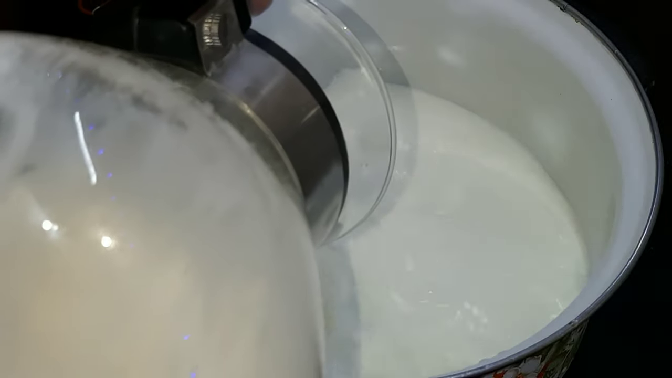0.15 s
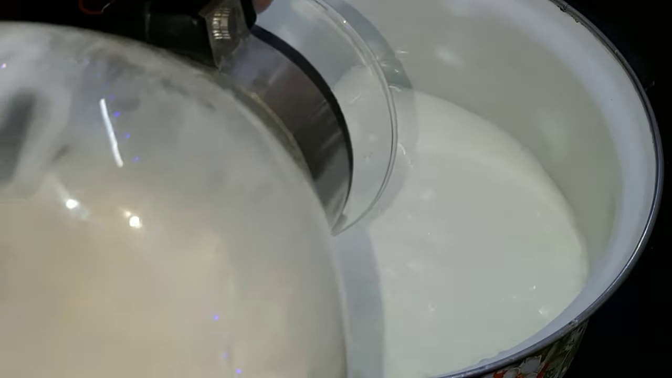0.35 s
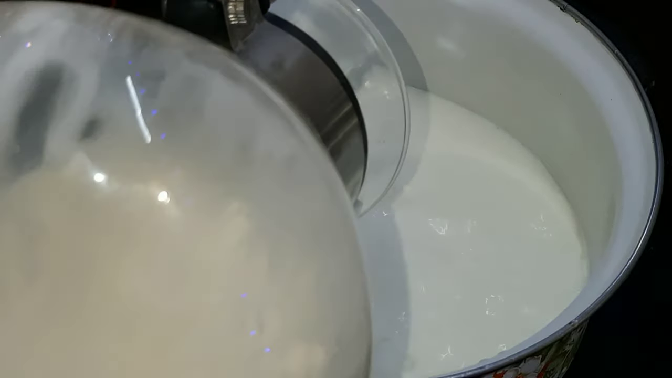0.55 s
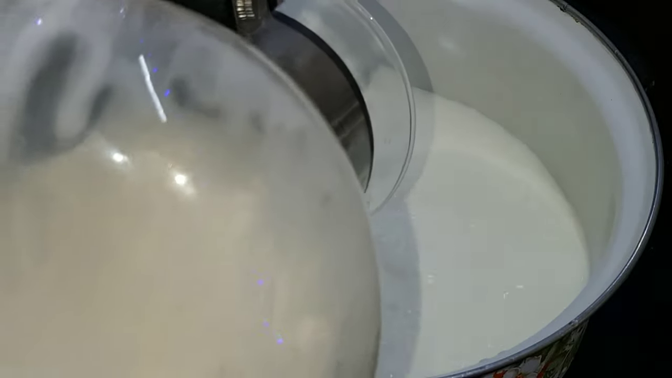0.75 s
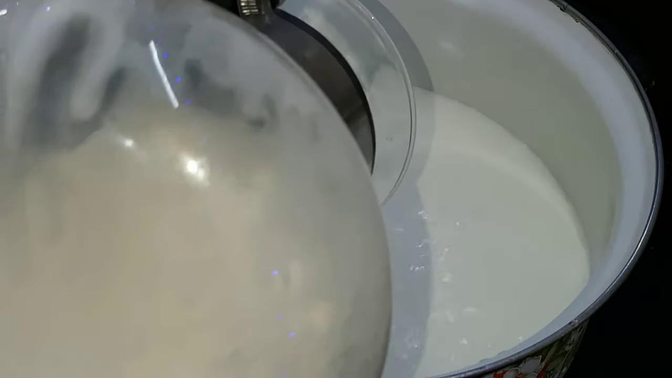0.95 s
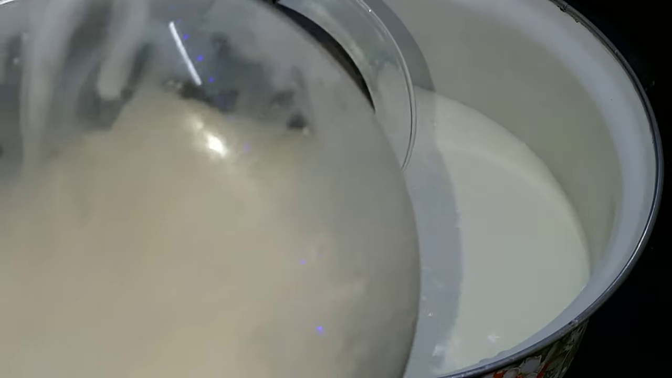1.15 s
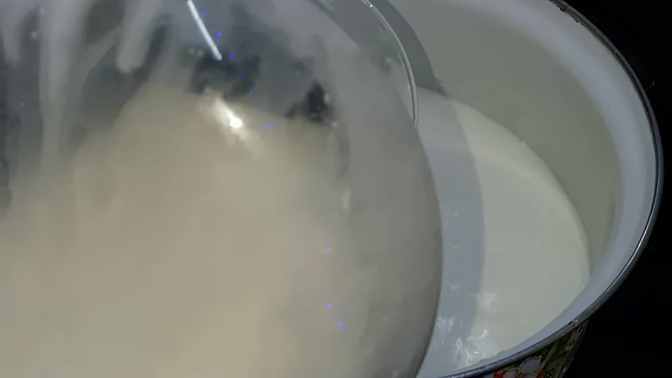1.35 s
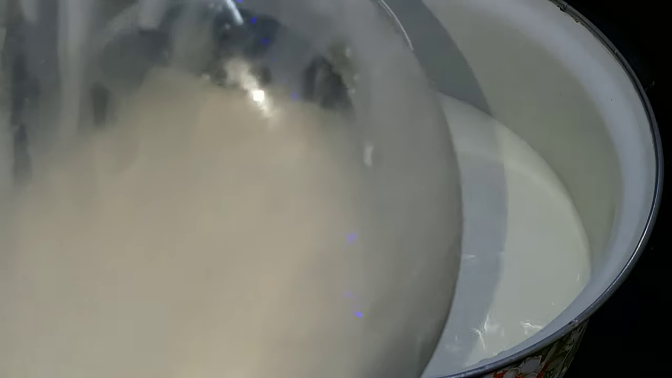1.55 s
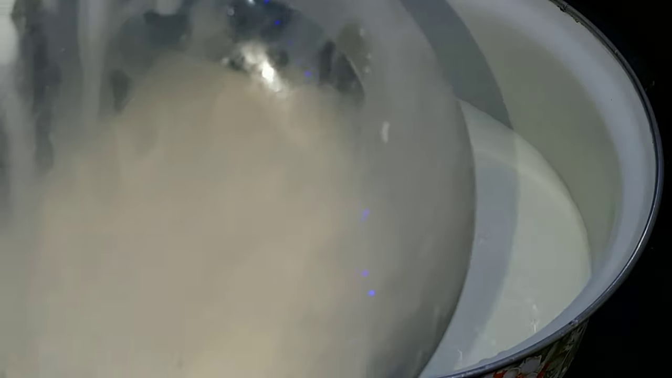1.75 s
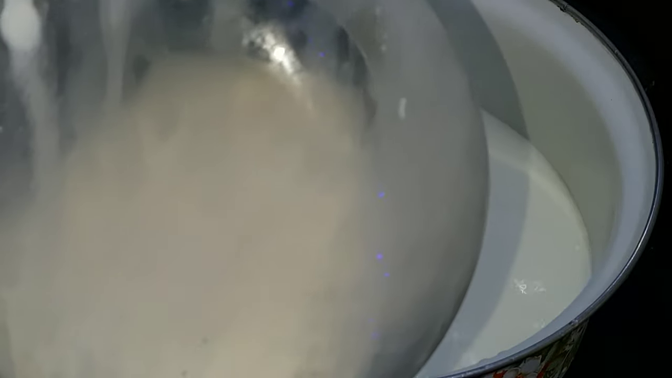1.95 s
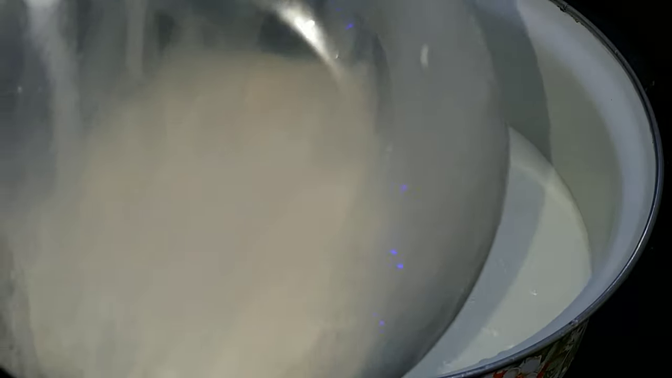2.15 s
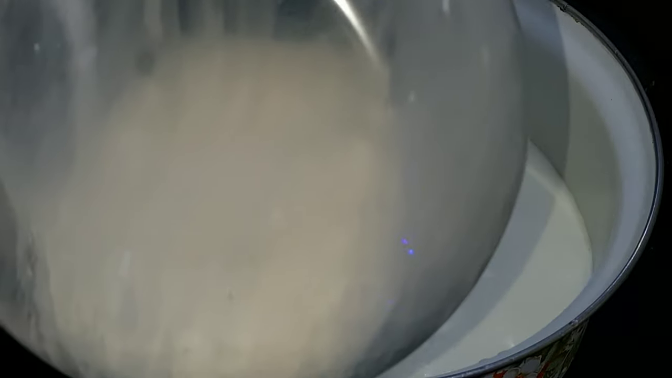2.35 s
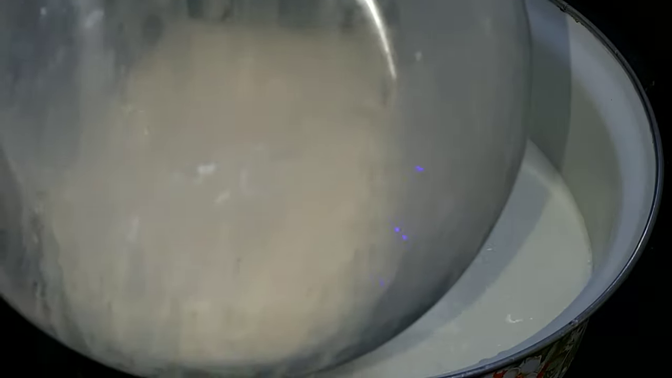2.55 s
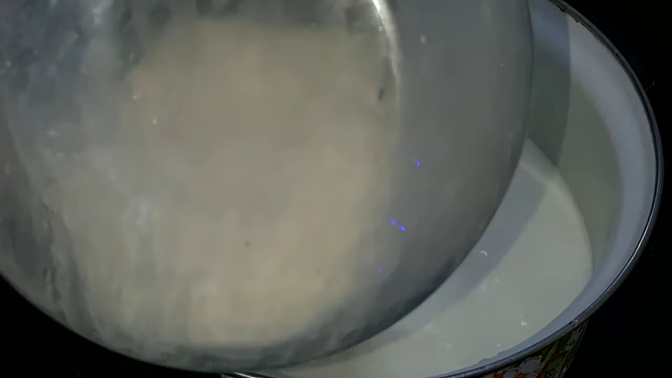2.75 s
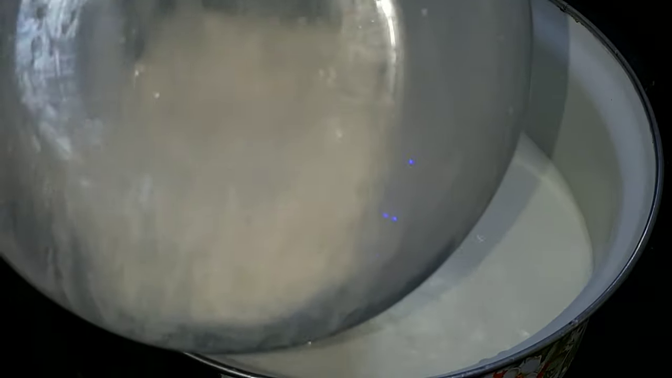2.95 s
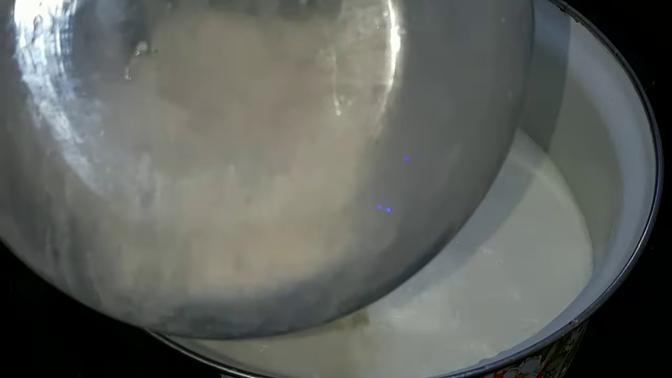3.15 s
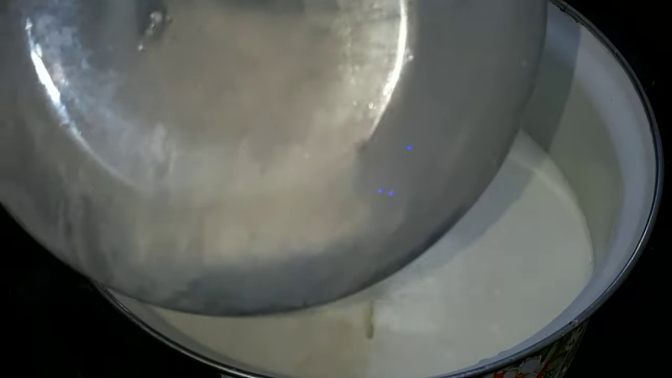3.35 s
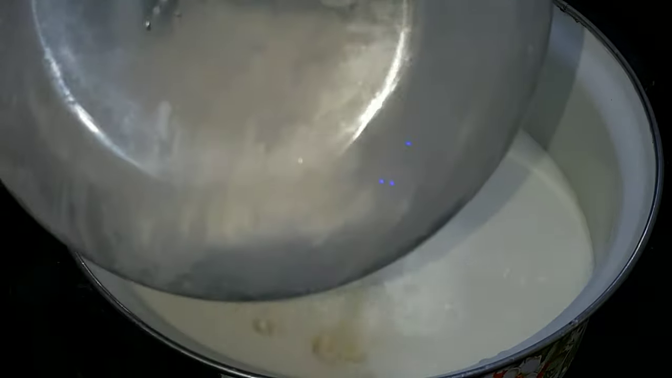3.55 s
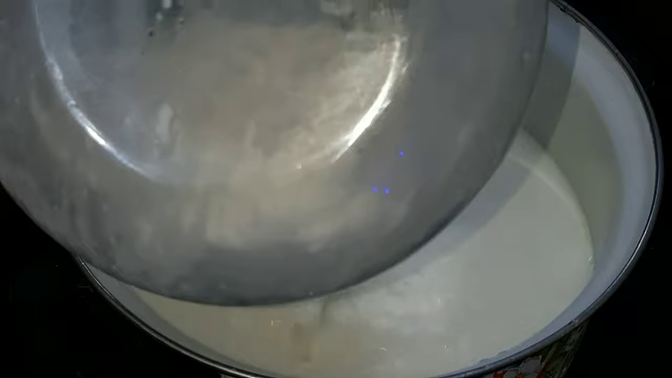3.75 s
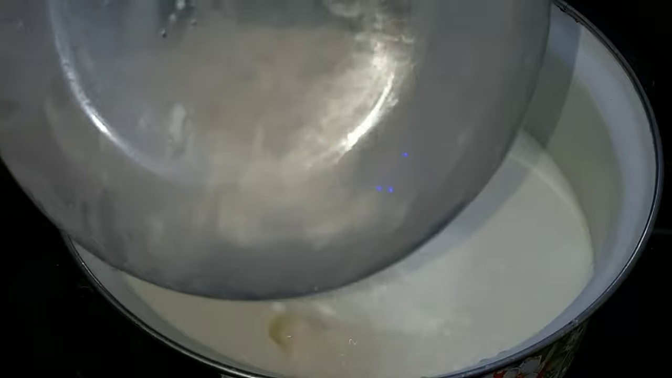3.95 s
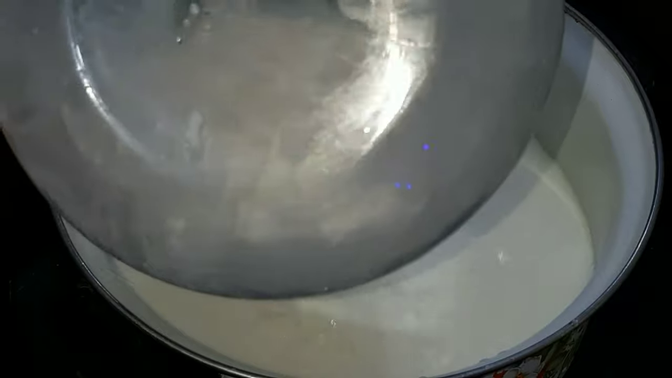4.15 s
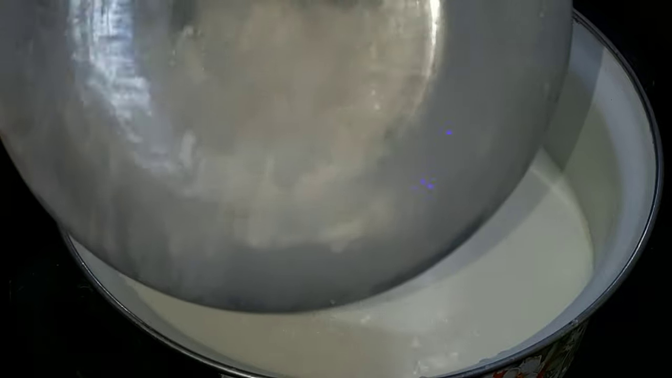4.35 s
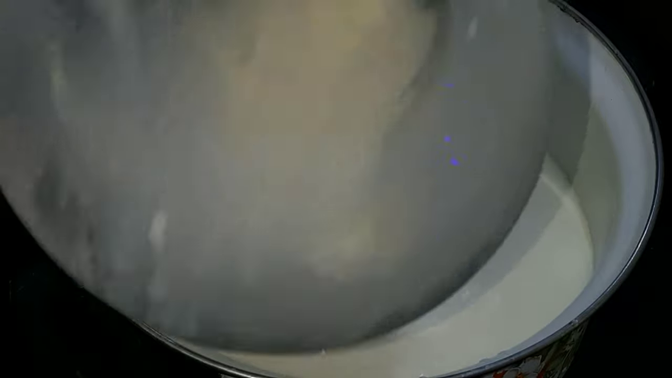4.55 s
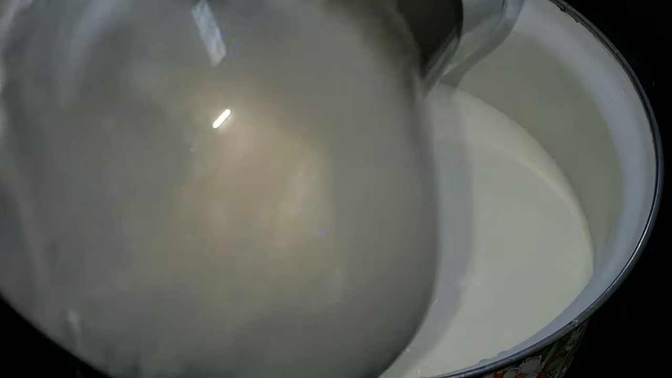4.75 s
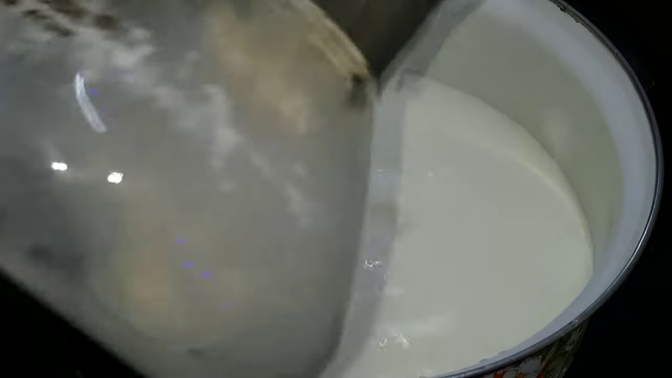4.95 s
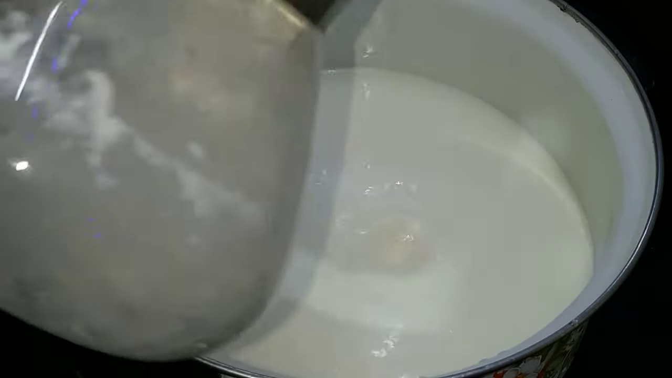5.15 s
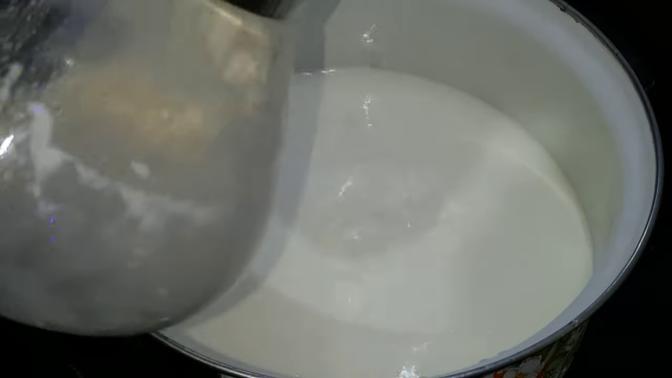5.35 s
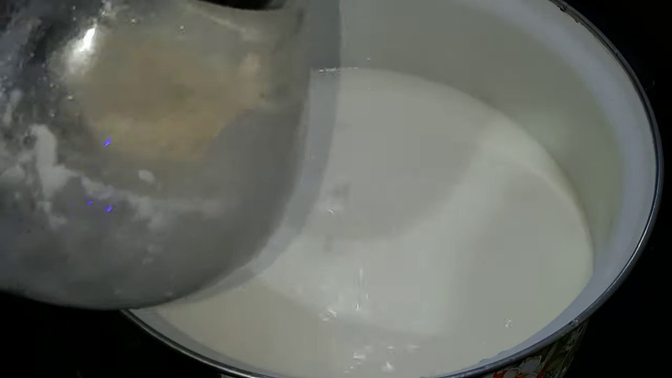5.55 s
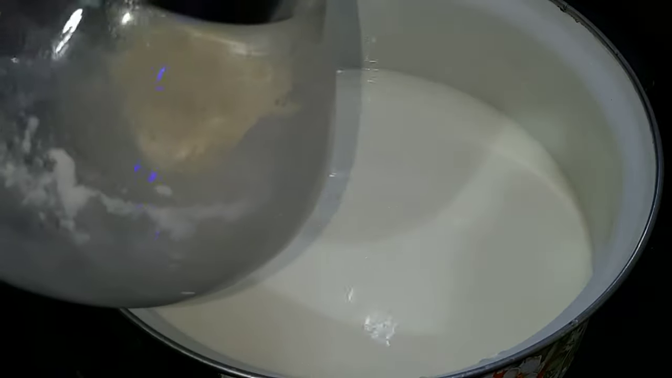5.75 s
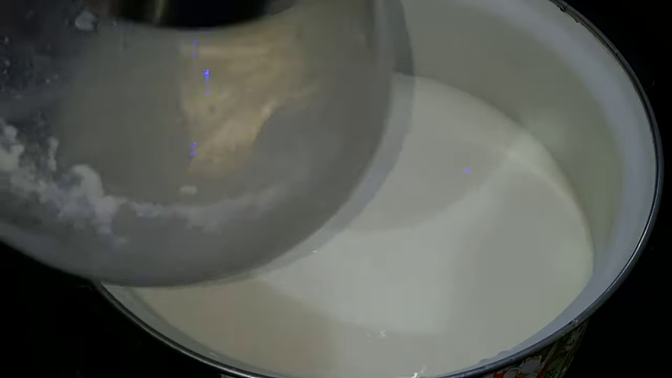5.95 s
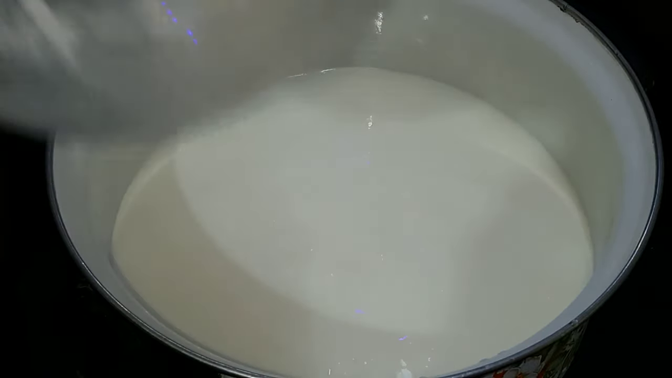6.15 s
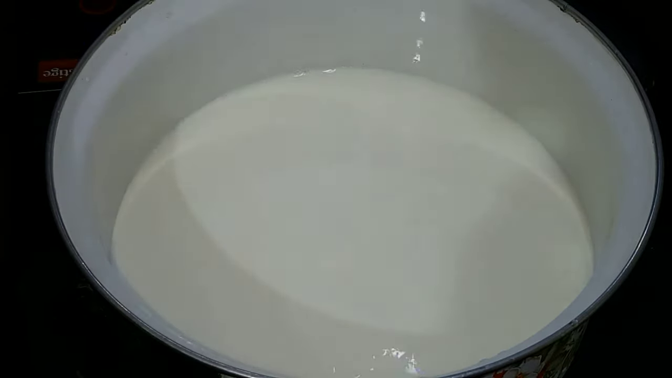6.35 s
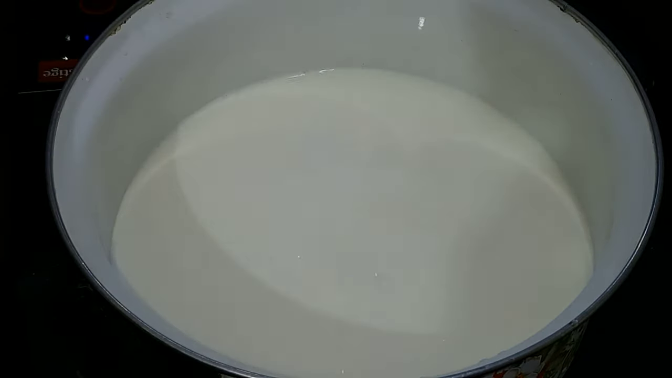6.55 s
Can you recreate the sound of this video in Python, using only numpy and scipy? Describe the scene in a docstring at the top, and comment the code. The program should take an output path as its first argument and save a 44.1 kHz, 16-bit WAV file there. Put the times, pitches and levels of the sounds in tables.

```python
"""A small kitchen, close by: milk is poured from a big vessel into a wide metal pot.
The stream is trains of gliding sine bubbles, ever larger ones, that ring the modes of the air in the pot;
splats and spray are coloured noise, and a few drops plink at the end.
Then the vessel knocks and settles: damped modes, dull shaking, noise cracks and small pings.
Beneath lie a shaped-noise rumble, hum sines, a thin throbbing whine and a soft rush that swells late."""
import sys
import numpy as np
from scipy import signal
from scipy.fft import rfft, irfft, next_fast_len
from scipy.io import wavfile
from scipy.ndimage import uniform_filter1d

SR = 44100
rng = np.random.default_rng(int(sys.argv[2]) if len(sys.argv) > 2 else 0)


def log_audio(samples):
    """Write samples as a 16-bit WAV file to the path given in sys.argv[1]."""
    # one column per channel
    frames = np.atleast_2d(samples).T
    # limit to full scale, then quantise
    limited = np.clip(frames, -1, 1)
    pcm = np.round(limited * 32767).astype(np.int16)
    wavfile.write(sys.argv[1], SR, pcm)


N = 290831  # length in samples

# the stream: (time [s], relative gurgle level [dB], relative spray level [dB])
STREAM_FLOW = [(0.0, -45, -37), (0.35, -49, -36.5), (0.67, -45.5, -37.5), (1.63, -37, -35.5),
               (2.01, -29.5, -37), (2.47, -31, -35), (2.69, -30.5, -38), (3.49, -30, -37), (3.87, -46, -49)]
# loudest pockets of air:
# (time [s], relative peak [dB], bubble pitch [Hz], relative splash level [dB], relative thump level [dB])
AIR_POCKETS = [(0.262, -22, 2310, -40, -46), (0.289, -19, 2530, -35, -38), (0.58, -22.5, 1540, -29, -29.5),
               (0.701, -22, 1870, -38.5, -35), (0.764, -24, 1530, -34, -36.5),
               (0.837, -18, 2540, -31, -38.5), (1.024, -22.5, 1110, -21.5, -28.5),
               (1.076, -14, 1340, -27.5, -37), (1.129, -21, 1440, -27.5, -39),
               (1.23, -15.5, 3300, -30, -43), (1.268, -10.5, 2110, -24.5, -41),
               (1.289, -17.5, 1030, -28, -37.5), (1.449, -14.5, 1650, -18.5, -29.5),
               (1.516, -19.5, 900, -31, -36.5), (1.617, -20, 1660, -22, -39.5),
               (1.632, -14.5, 900, -20.5, -31), (1.794, -14, 1010, -35, -35), (1.813, -13, 770, -27, -28.5),
               (1.874, -21, 982, -39, -23.5), (1.948, -18, 1070, -25.5, -26.5),
               (1.991, -13.5, 1160, -21.5, -21), (2.063, -19, 750, -20, -28), (2.168, -11, 982, -24, -18.5),
               (2.209, -11, 746, -20.5, -25.5), (2.38, -17, 1530, -29, -26.5),
               (2.416, -10, 1110, -27, -28.5), (2.602, -12, 1950, -17.5, -30),
               (2.63, -10, 835, -20.5, -22.5), (2.661, -13.5, 830, -27.5, -20),
               (2.707, -12, 740, -29.5, -24.5), (2.749, -13.5, 780, -31, -20.5),
               (2.848, -11, 700, -26, -27), (2.876, -13, 1580, -23, -22), (3.067, -16.5, 760, -32.5, -40),
               (3.102, -18.5, 740, -35, -36.5), (3.171, -8.5, 720, -33.5, -27.5),
               (3.242, -13, 710, -23.5, -25.5), (3.268, -12.5, 716, -28.5, -21),
               (3.318, -17.5, 735, -33, -22), (3.398, -8.5, 740, -25.5, -18),
               (3.429, -11.5, 716, -22.5, -26), (3.52, -12.5, 726, -17.5, -21),
               (3.622, -13, 780, -24.5, -42), (3.675, -18, 740, -32, -41), (3.758, -19, 835, -29, -52),
               (3.896, -14, 780, -24.5, -28)]
# blows of the vessel: (time [s], relative ring level [dB], contact corner [Hz], crack level [dB])
VESSEL_BLOWS = [(4.827, -12, 7000, -6.5), (4.892, -31, 432, -51), (4.925, -37.5, 7000, -17.5),
                (5.063, -20.5, 112, -61)]

POUR_S = 4.2  # end of the stream
THINS_S, THIN_DB_PER_S = 3.615, 56  # the vessel runs empty and the small bubbles die away
BUILD_S, BUILD_DB = 0.56, -16.5  # the small bubbles build up as the pour gets going
FULL_FLOW_DB = -32  # gurgle level that counts as full flow
GUSH_S, GUSH_DB = 0.058, 3.5  # the stream gushes after each pocket of air and lulls in between
BIG_GULP_HZ = 770
WHINE_HZ, THROB_HZ, THROB_PEAK_S = 6755, 9.13, 6.07
LEFT_DB = -4  # left channel relative to right
TOP_HZ = 16000


def stream(pot, gurgle_db=-7, tinkle_db=-38, foam_db=-4.0, spray_db=0.24, direct_db=-12, ring_db=-4,
           big_hz=620, big_octaves_per_db=-0.01, small_hz=1620, octaves_per_db=0.01):
    """The falling milk: big bubbles boom in the pot, small ones tinkle, foam crackles, spray hisses."""
    t = np.arange(N) / SR
    flow = flow_db(t)
    shrink = 2 ** (-octaves_per_db * flow)  # smaller, higher bubbles in a weaker flow
    big_pitch_hz = big_hz * 2 ** (big_octaves_per_db * flow)
    big = bubbles(rate=170, pitch_hz=big_pitch_hz, octaves=0.6, cycles=4.7, scatter_db=3.5)
    small = bubbles(rate=320, pitch_hz=small_hz * shrink, octaves=0.902, cycles=23.7, scatter_db=4.5)
    foam = bubbles(rate=240, pitch_hz=4900 * shrink, octaves=0.638, cycles=39, scatter_db=6)
    droplets = spray(rate=390, scatter_db=6.5, smear_s=0.0021, mist_db=-7)

    building = amp(BUILD_DB * np.maximum(1 - t / BUILD_S, 0))
    thinning = amp(-THIN_DB_PER_S * np.maximum(t - THINS_S, 0))
    running = np.clip((POUR_S - t) / 0.44, 0, 1)  # the stream breaks, and its spray goes first

    gurgle = steady(through(big, pot) + amp(direct_db) * big)
    gurgle = gurgle * amp(FULL_FLOW_DB + flow + gurgle_db)
    tinkle = steady(small + amp(ring_db) * through(small, pot))
    tinkle = tinkle * amp(tinkle_db) * building * thinning
    hiss = steady(foam) * amp(foam_db) + steady(droplets) * amp(spray_db)
    hiss = hiss * amp(curve(STREAM_FLOW, axis=2)) * running ** 2
    return ((gurgle + tinkle) * gushes() + hiss) * running


def flow_db(s):
    """Strength of the flow at a time, in dB relative to full flow."""
    when, gurgle_db, _ = np.transpose(STREAM_FLOW)
    return np.interp(s, when, gurgle_db) - FULL_FLOW_DB


def bubbles(rate, pitch_hz, octaves, cycles, scatter_db):
    """A random train of bubbles (rate per second) around a moving pitch; a few are much louder."""
    out = np.zeros((2, N))
    for when, spread, life, size, place in rng.random((int(rate * POUR_S), 5)):
        s = when * POUR_S
        hz = pitch_hz[int(s * SR)] * 2 ** (octaves * (2 * spread - 1))
        gain = amp(-scatter_db * np.log(1 - .97 * size))
        add(out, s, gain * bubble(hz, cycles * (.5 + life), place))
    return out


def bubble(hz, cycles, place, glide=0.11, lag_s=0.00014):
    """A trapped bubble rings down as its pitch glides by a share; its place (0-1) delays it on the left."""
    life = cycles / hz
    delay = np.array([[place * lag_s], [0]])
    age = np.maximum(seconds(life) - delay, 0) / life
    tone = np.sin(2 * np.pi * cycles * (age + glide * age ** 2 / 2))
    return tone * np.exp(-np.log(300) * age) * (1 - np.exp(-age * cycles * 2))


def gushes():
    """Gain of the bubbling: it jumps when a pocket of air closes and sinks back."""
    kicks = np.zeros(N)
    kicks[[int(row[0] * SR) for row in AIR_POCKETS]] = 1
    surge = signal.lfilter([1], [1, -np.exp(-1 / (GUSH_S * SR))], kicks)
    return amp(GUSH_DB * np.minimum(surge, 1))


def spray(rate, scatter_db, smear_s, mist_db, size=70):
    """Droplets of three sizes tick on the surface, each in its own band, over a fine fizz of foam."""
    # colour of the spray: (frequency [Hz], level [dB])
    spray_colour = [(300, -32.5), (1200, -5.5), (2500, 1), (3500, 1), (4800, -3.5), (6200, -0.5),
                    (7400, 7.5), (8400, -5.5), (12000, -1), (16000, -6.5)]
    out = 0
    for edges_hz in [(300, 4500), (4500, 9000), (9000, 17000)]:
        ticks = np.zeros(N)
        when, mass = rng.random((int(rate * N / SR), 2)).T
        ticks[(when * N).astype(int)] = amp(scatter_db * np.minimum(-np.log(1 - mass), 4.5))
        # each tick becomes a short decaying patch of noise power
        power = signal.lfilter([1], [1, -np.exp(-2 / (smear_s * SR))], ticks ** 2)
        power = np.abs(uniform_filter1d(power, size))
        hiss = np.sqrt(power / power.mean() + amp(mist_db) ** 2) * rng.standard_normal((2, N))
        out = out + signal.sosfilt(signal.butter(2, edges_hz, "band", fs=SR, output="sos"), hiss)
    return colour(out, spray_colour)


def pot_air(apart_hz=2200, lag_s=0.00008):
    """Impulse response of the air from milk to rim; higher modes reach the sides more out of step."""
    # modes of the air in the pot: (frequency [Hz], width [Hz], level [dB])
    air_modes = [(353,7.3,-10.5), (412.6,16,0.5), (431.7,29,3), (505,16,-8.5), (532,31,1), (671,22,-5),
                 (745,17,6), (794,49,-6.5), (915,22,-9), (1020,23,-9.5), (1110,25,-6.5), (1142,21,-6),
                 (1330,28,-10.5), (1610,93,3), (1700,25,-8)]
    t = seconds(.12)
    side = np.array([[-1], [1]])
    response = 0
    for k, (hz, width, db) in enumerate(air_modes):
        decay = 2 * np.pi * width / SR * np.exp(-np.pi * width * t)
        phase = 2 * np.pi * hz * (t + side * lag_s / 2) + side * (-1) ** k * hz / apart_hz
        response = response + amp(db) * decay * np.cos(phase)
    return response


def thump(pot, hz=445, cycles=7.7):
    """The hollow note of the air in the pot when the surface is dented."""
    dent = np.pad(bubble(hz, cycles, .5), ((0, 0), (0, pot.shape[1])))
    return peak(through(dent, pot))


def gulps(pot, gulp_db=-1.5, cycles=9, cluster_db=4, cluster_s=.013, slap_db=7.0, ring_db=-5,
          boom_db=2, follow=.25):
    """Each pocket of air closes with a wet slap, rings, sheds smaller bubbles and thumps the pot air."""
    # colour of a wet slap, before its shift with pitch: (frequency [Hz], level [dB])
    slap_colour = [(200, -19.5), (700, -0.5), (1700, 0), (2600, -11.5), (8000, -21.5)]
    out, count = np.zeros((2, N)), 6000  # count: samples of room for the ring of the pot
    boom = thump(pot)
    for s, db, hz, splash_db, thump_db in AIR_POCKETS:
        # big pockets burst within a few cycles; small ones ring for more and splash brighter
        bright = (hz / BIG_GULP_HZ) ** follow
        main = bubble(hz, cycles * hz / BIG_GULP_HZ, rng.random(), glide=0.047)
        main = np.pad(main, ((0, 0), (0, count)))
        slap = burst(0.0055, [(f * bright, d) for f, d in slap_colour], rise_s=0.0025)
        add(out, s, amp(db + gulp_db) * peak(main + amp(ring_db) * through(main, pot)))
        add(out, s, amp(thump_db + boom_db) * boom)
        add(out, s, amp(splash_db + slap_db) * slap)
        for wait, pitch, place in rng.random((4, 3)):
            shed = bubble(950 * bright * 2 ** (1.6 * pitch), 8.2, place)
            add(out, s + cluster_s * wait ** 2, amp(splash_db + cluster_db) * shed)
    return out


def splats(splat_db=0, tone_db=0.5, decay_s=0.0019, cycles=38, mist_db=6, fallback_db=-19.0,
           fallback_s=0.027):
    """A drop smacks the surface, leaves a tiny ringing bubble and throws up a mist that patters back."""
    # sharpest splats: (time [s], relative peak [dB], brightest pitch [Hz], fine mist relative to it [dB])
    sharp_splats = [(1.345, -19.5, 3200, 2), (1.5148, -17, 3580, -22.5), (1.732, -16.5, 7400, -18),
                    (1.9505, -18.5, 2920, -11), (2.1151, -14, 3290, -14), (2.1536, -15.5, 7600, -19.5),
                    (2.326, -17.5, 5000, -20), (2.3593, -14, 7500, -19), (2.415, -20, 7900, -20.5),
                    (2.4691, -15.5, 7400, -13), (2.63, -14, 6200, -24.5), (2.8732, -12, 7350, -8.5),
                    (3.005, -17, 5100, -19), (3.2348, -12, 7200, -15), (3.3348, -23, 3170, -7.5),
                    (3.3712, -14, 6450, -22), (3.5057, -15, 3900, -10), (3.5189, -12.5, 7100, -27),
                    (3.56, -11, 4490, -35), (3.6195, -14, 3960, -21), (3.675, -18, 7000, -10),
                    (3.8267, -25.5, 6840, -7), (3.8942, -17, 7100, -12), (3.975, -12, 7100, -17),
                    (4.123, -29.5, 6040, -11), (4.1642, -14.5, 7340, -12), (4.2057, -26, 5200, -21),
                    (5.1147, -31, 9350, -3.5), (5.4034, -42.5, 6570, -10)]
    mist_colour = [(3000, -32.5), (7000, -2.5), (13000, -2.0), (16000, -8.0)]
    out, t = np.zeros((2, N)), seconds(0.09)
    shape = np.exp(-t / decay_s) + amp(fallback_db) * np.exp(-t / fallback_s)
    shape = shape * (1 - np.exp(-t / 0.002))
    for s, db, hz, mist_rel in list(sharp_splats) + lesser_splats():
        mist = colour(rng.standard_normal((2, len(t))) * shape, mist_colour, size=512)
        # brightest near its own pitch
        smack = [(hz / 4, -20), (hz * 0.74, -6), (hz, 0), (hz * 1.29, -7), (hz * 3, -13)]
        add(out, s, amp(db + splat_db) * burst(decay_s, smack, rise_s=0.0022))
        add(out, s + 0.001046, amp(db + tone_db) * bubble(hz, cycles, rng.random()))
        add(out, s, amp(db + mist_rel + mist_db) * peak(mist))
    return out


def lesser_splats(rate=5, db=-22.0, spread_db=3, pitch_hz=4800, octaves=.65, mist_db=-15):
    """Quieter splats at random times until the stream thins, as (s, dB, Hz, mist dB)."""
    when, size, pitch = rng.uniform(-1, 1, (int(rate * THINS_S), 3)).T
    s = THINS_S * (when + 1) / 2
    hz = pitch_hz * 2 ** (octaves * pitch)
    return list(zip(s, db + spread_db * size, hz, np.full(len(s), mist_db)))


def drips(pot, rise_s=0.0008, slap_db=-12, boom_db=-10):
    """A lone drop pats the surface, plinks with a short or long ring and stirs the air in the pot."""
    # last drips: (time [s], relative peak [dB], bubble pitch [Hz], ring length [cycles], glide [share])
    last_drips = [(3.896,-23.5,1540,27,0.016), (3.897,-24.5,2460,30,0), (3.978,-23.5,1220,5.7,0.04),
                  (4.018,-25.5,1000,8.4,0.088), (4.119,-28.5,1390,14,0.12), (4.166,-30,1370,5.3,0.0029),
                  (4.293,-21.5,1540,46,-0.078), (4.382,-37.5,3710,41,.03)]
    out, boom = np.zeros((2, N)), thump(pot)
    for s, db, hz, cycles, glide in last_drips:
        plink = bubble(hz, cycles, rng.random(), glide=glide)
        plink = plink * (1 - np.exp(-np.arange(plink.shape[1]) / SR / rise_s))
        pat = burst(0.014, [(hz / 3, -16), (hz, 0), (hz * 2, -18), (hz * 4, -30)])
        add(out, s, amp(db) * peak(plink))
        add(out, s, amp(db + slap_db) * pat)
        add(out, s, amp(db + boom_db) * boom)
    return out


def knock_ring(rise_s=0.002, contact_damping=0.37):
    """Every blow rings the same modes; a soft, springy contact reaches only the low ones."""
    # modes of the vessel: (frequency [Hz], relative level [dB], decay by 60 dB [s])
    vessel_modes = [(67.9, -15.5, 0.84), (111, -11.5, 0.28), (151.4, -4, 0.22), (185.6, -15, .2),
                    (212.5, -13, 0.57), (242, -11.5, 0.198), (274, -7.5, 0.21), (284.5, -6.5, 0.27),
                    (333, -3, 0.22), (363.5, -2.5, 0.18), (406, 4, .1), (415, 2.5, 0.22), (437.2, -2, 0.27),
                    (497, -17, .2), (562, -14.5, 0.23), (648, -19, 0.18), (776, -24, 0.44),
                    (900, -27, 0.28), (1060, -25, 0.22), (1740, -28.5, 0.28), (2340, -26.5, 0.253),
                    (3360, -13, 0.2), (3470, -15, 0.14), (3800, -24, 0.288), (4100, -18, .27),
                    (4307, -30, 0.316)]
    out, t = np.zeros((2, N)), seconds(.7)
    hz, mode_db, t60 = np.transpose(vessel_modes)
    modes = np.exp(np.outer(2j * np.pi * hz - np.log(1000) / t60, t)) * (1 - np.exp(-t / rise_s))
    for s, db, corner_hz, _ in VESSEL_BLOWS:
        contact = 1 / np.hypot(1 - (hz / corner_hz) ** 2, contact_damping * hz / corner_hz)
        push = amp(db + mode_db) * contact * np.exp(2j * np.pi * rng.random(len(hz)))
        add(out, s, (push @ modes).imag)
    return out


def shudder(shudder_db=-3, t60=0.34, soft_hz=250):
    """The dense, dull shaking under each blow; soft contacts stir it less."""
    body_colour = [(60, -34), (170, 0.5), (430, -3.5), (520, -9), (4000, -39)]
    out, t = np.zeros((2, N)), seconds(0.48)
    for s, db, corner_hz, _ in VESSEL_BLOWS:
        body = colour(stereo_noise(len(t), alike_hz=900) * amp(-60 * t / t60), body_colour)
        add(out, s, amp(db + shudder_db) * corner_hz / (corner_hz + soft_hz) * peak(body))
    return out


def knock_clatter(decay_s=0.0028, rattle_db=-9, rattle_s=0.048):
    """The hard crack and dull rattle of each contact, and rough pings of narrow noise as it settles."""
    # colour of the crack: (frequency [Hz], level [dB])
    crack_colour = [(200, -3), (900, -9), (1700, -10.5), (2900, -8), (3700, 1.5), (4500, 3), (5400, -5),
                    (6400, 0), (7700, -4), (8700, -18), (16000, -18)]
    # small pings: (time [s], peak [dB], pitch [Hz], relative half-width [share], decay by 60 dB [s], rise [s])
    settling_pings = [(4.925, -23, 3780, 0.077, 0.034, 0.00065), (5.063, -42.5, 1470, 0.16, 0.2, .001),
                      (5.085, -43, 3220, 0.036, 0.49, .06), (5.352, -56.5, 4380, .03, 0.15, .002),
                      (6.13, -56, 1730, 0.036, 0.33, 0.016)]
    rattle_colour = [(80, -34.0), (300, -21), (600, 3), (900, -3), (1500, -9.5), (3000, -28), (9000, -39)]
    out, t = np.zeros((2, N)), seconds(0.43)
    for s, db, corner_hz, crack_db in VESSEL_BLOWS:
        add(out, s, amp(crack_db) * burst(decay_s, crack_colour, rise_s=0.00044))
        rattle = burst(rattle_s, rattle_colour)
        # soft contacts rattle less
        add(out, s, amp(db + rattle_db) * corner_hz / (corner_hz + 700) * rattle)
    for s, db, hz, width, t60, rise_s in settling_pings:
        band = signal.butter(2, [hz / (1 + width), hz * (1 + width)], "band", fs=SR, output="sos")
        shape = amp(-60 * t / t60) * (1 - np.exp(-t / rise_s))
        ping = signal.sosfilt(band, rng.standard_normal((2, len(t)))) * shape
        add(out, s, amp(db) * peak(ping))
    return out


def background(whine_db=-70, hiss_db=-73, throb_db=9, hiss_throb_db=-0.5):
    """Low rumble with a motor hum, a thin throbbing whine in a narrow hiss and a late soft rush."""
    # low rumble: (frequency [Hz], density [dB per Hz]), and its course: (time [s], level [dB])
    rumble_colour = [(28, -38), (45, -14.5), (70, 1.5), (115, -3.5), (170, -9.5), (260, -7.5), (400, -11.5),
                     (580, -14), (750, -27), (1100, -33), (2500, -38), (5500, -45.5), (9000, -49),
                     (15500, -38.5)]
    rumble_level = [(0, -45), (1.2, -43.5), (3.6, -42.5), (4.6, -49.5), (5.5, -48.5), (6.59, -49)]
    # hum tones: (frequency [Hz], level [dB])
    hum_tones = [(75.4, -55), (102.3, -59.5), (147, -57)]
    # thin hiss around the whine: (frequency [Hz], level [dB])
    hiss_colour = [(100, -62), (5800, -42), (6250, -6.5), (6550, 0.5), (6760, 0.5), (6950, -2.5),
                   (7050, -6.5), (7600, -13), (8300, -36)]
    # soft rush: (frequency [Hz], density [dB per Hz]), and its swell: (time [s], level [dB])
    rush_colour = [(200, -21.5), (350, -12), (520, 3), (650, -1.5), (880, 0), (1050, -25), (1450, -26.5),
                   (1720, -15.5), (2100, -27.5), (8000, -40)]
    rush_level = [(0, -79), (5.4, -79), (5.9, -63.5), (6.35, -56), (6.59, -54)]

    def air(points, alike_hz):
        """Coloured stereo noise at an rms of one."""
        x = colour(stereo_noise(N, alike_hz), points, size=4096)
        return x / x.std()

    t = np.arange(N) / SR
    hum = 0
    for hz, db in hum_tones:
        hum = hum + amp(db) * np.sqrt(2) * np.sin(2 * np.pi * (hz * t + rng.random()))
    throb = np.cos(2 * np.pi * THROB_HZ * (t - THROB_PEAK_S))
    waver = np.cumsum(rng.standard_normal((2, N)), axis=1) * .03  # random walk of the phase
    whine = np.sqrt(2) * np.sin(2 * np.pi * WHINE_HZ * t + waver)
    whine = whine * amp(whine_db + throb_db * (throb - 0.5))
    hiss = amp(hiss_db + hiss_throb_db * throb) * air(hiss_colour, 100)
    rumble = amp(curve(rumble_level)) * air(rumble_colour, 370)
    rush = amp(curve(rush_level)) * air(rush_colour, 600)
    return hum + whine + hiss + rumble + rush


def room(x, near_db, far_db, near_s=0.0064, t60=0.34, treble_t60=0.26):
    """Quick reflections off the pot wall, then the tail of the small kitchen."""
    t = seconds(.6)
    near = stereo_noise(len(t), alike_hz=900) * np.exp(-t / near_s) * (t > .0003)
    near = signal.sosfilt(signal.butter(2, 1100, "high", fs=SR, output="sos"), near)
    tail = stereo_noise(len(t), alike_hz=332) * (1 - np.exp(-t / 0.0015))
    low = signal.sosfilt(signal.butter(1, 4000, fs=SR, output="sos"), tail)
    far = low * amp(-60 * t / t60) + (tail - low) * amp(-60 * t / treble_t60)
    response = amp(near_db) * near / np.linalg.norm(near[0])
    response += amp(far_db) * far / np.linalg.norm(far[0])
    response[:, 0] += 1  # the direct sound
    return through(x, response / np.linalg.norm(response[1]))


def burst(decay_s, points, rise_s=0.0016):
    """A brief coloured crack of noise, 40 ms long."""
    t = seconds(.04)
    shape = np.exp(-t / decay_s) * (1 - np.exp(-(t / rise_s) ** 2))
    return peak(colour(stereo_noise(len(t), alike_hz=1530) * shape, points, size=512))


def stereo_noise(count, alike_hz):
    """Two noises, alike in the bass and unrelated in the treble."""
    size = next_fast_len(count, True)
    mid, side = rfft(rng.standard_normal((2, size)))
    alike = 1 / (1 + (np.fft.rfftfreq(size, 1 / SR) / alike_hz) ** 2)
    mid, side = mid * np.sqrt((1 + alike) / 2), side * np.sqrt((1 - alike) / 2)
    return irfft(np.array([mid + side, mid - side]), size)[:, :count]


def colour(x, points, size=2048):
    """Causal minimum-phase filter with a (Hz, dB) response."""
    hz, db = np.transpose(points)
    gain = amp(np.interp(np.log(np.fft.rfftfreq(size, 1 / SR) + 1), np.log(hz), db))
    # folding the cepstrum forward in time makes the filter causal
    cepstrum = irfft(np.log(gain))
    cepstrum[1:size // 2] *= 2
    cepstrum[size // 2 + 1:] = 0
    return through(x, irfft(np.exp(rfft(cepstrum))))


def through(x, response):
    """Both channels through an impulse response."""
    return signal.oaconvolve(x, np.atleast_2d(response), axes=1)[:, :x.shape[1]]


def amp(db):
    """Decibels to gain."""
    return 10 ** (np.asarray(db) / 20)


def curve(rows, axis=1):
    """One column of a timed table, at every sample."""
    rows = np.array(rows)
    return np.interp(np.arange(N) / SR, rows[:, 0], rows[:, axis])


def seconds(length):
    """Time axis of a short sound."""
    return np.arange(int(length * SR)) / SR


def peak(x):
    """Scale to a peak of one."""
    return x / np.abs(x).max()


def steady(x, size=6000):
    """Scale to a running rms of one, keeping the fast detail."""
    power = np.abs(uniform_filter1d((x * x).mean(axis=0), size))
    return x / np.sqrt(power + 1e-12)


def add(track, s, sound):
    """Mix a sound in at a time."""
    start = max(int(s * SR), 0)
    part = sound[..., :max(N - start, 0)]
    track[:, start:start + part.shape[-1]] += part


def scene(milk_db=2):
    """The pour and the knocks over the kitchen background, all a little to the right."""
    pot = pot_air()
    milk = room(stream(pot) + gulps(pot) + drips(pot) + splats(), near_db=-6.0, far_db=-3.0)
    knock = room(knock_ring() + shudder(), near_db=-18.0, far_db=-11.0)
    clatter = room(knock_clatter(), near_db=-5.5, far_db=-5.0)
    balance = amp(np.array([[LEFT_DB], [-LEFT_DB]]) / 2)
    return (amp(milk_db) * milk + knock + clatter + background()) * balance


def record(dry):
    """Soft saturation rounds the highest peaks, and a steep low-pass cuts the top."""
    rounded = .85 * np.tanh(dry / .85)
    return signal.sosfilt(signal.ellip(10, .2, 80, TOP_HZ, fs=SR, output="sos"), rounded)


dry = scene()
out = record(dry)
log_audio(out)
```